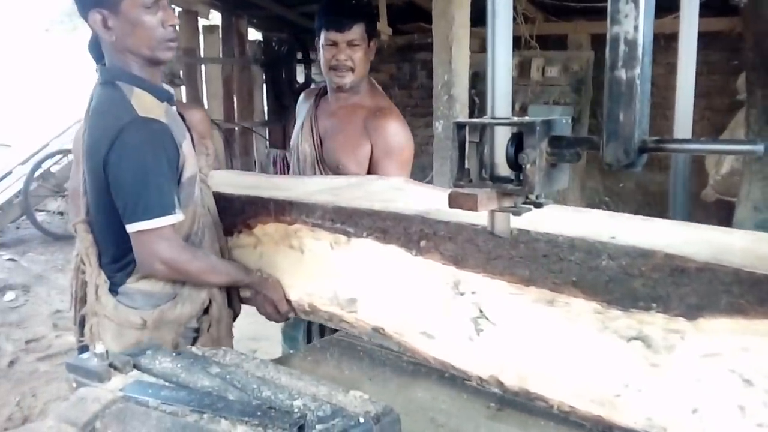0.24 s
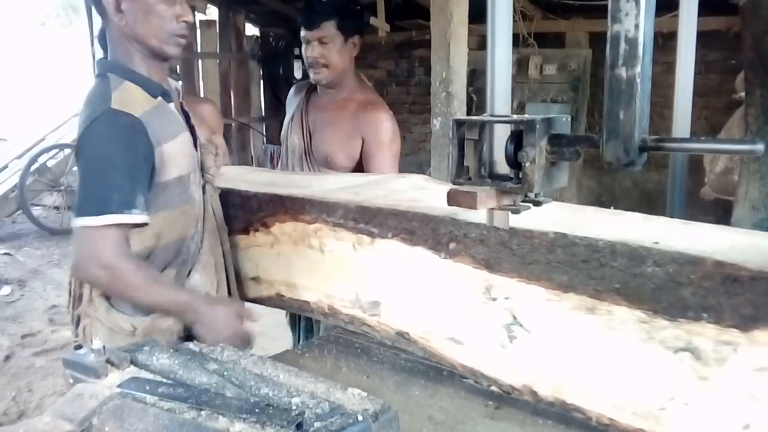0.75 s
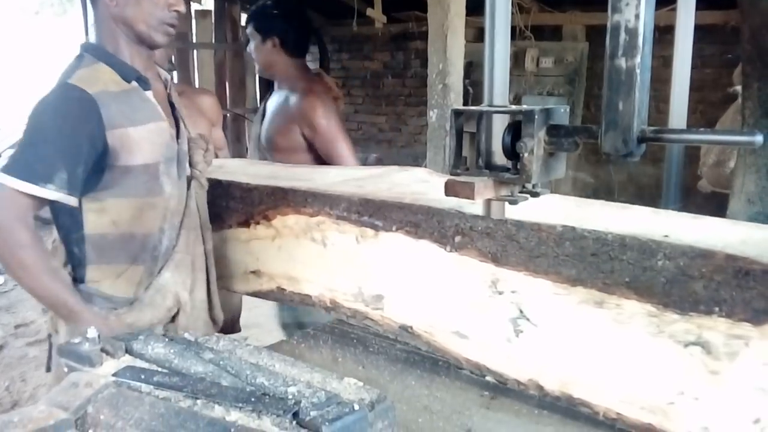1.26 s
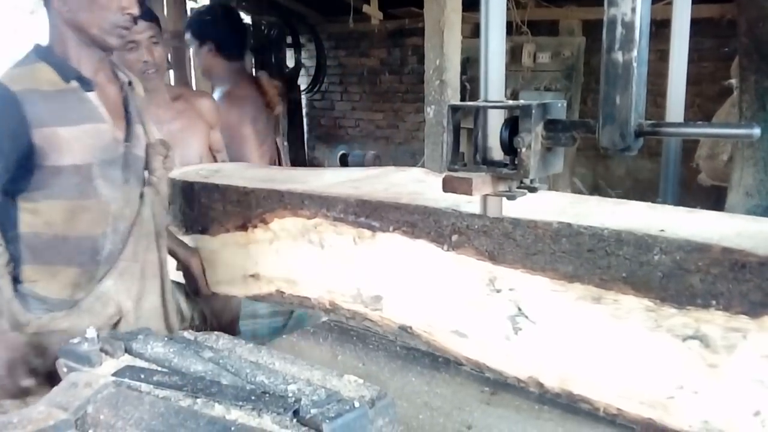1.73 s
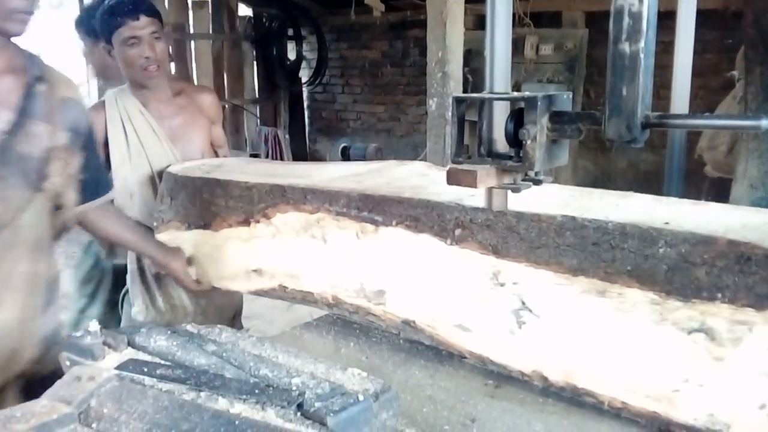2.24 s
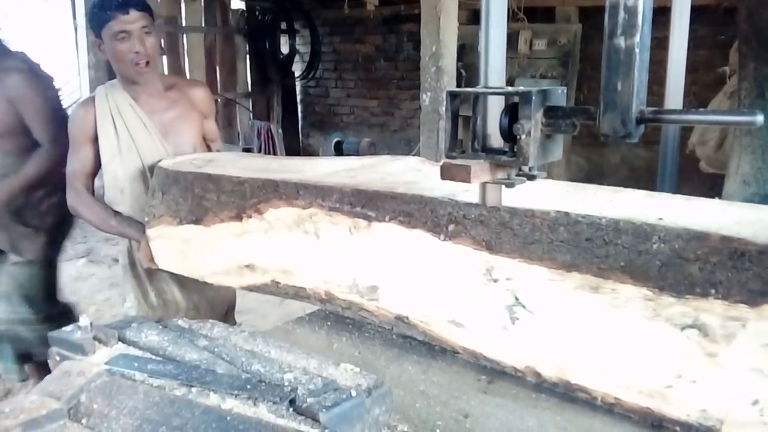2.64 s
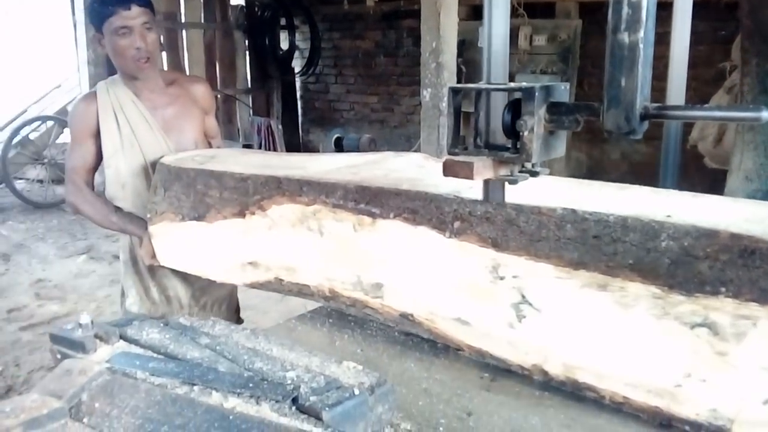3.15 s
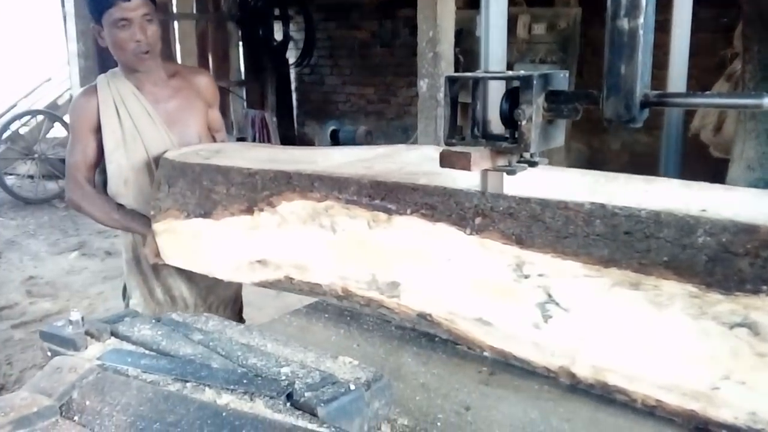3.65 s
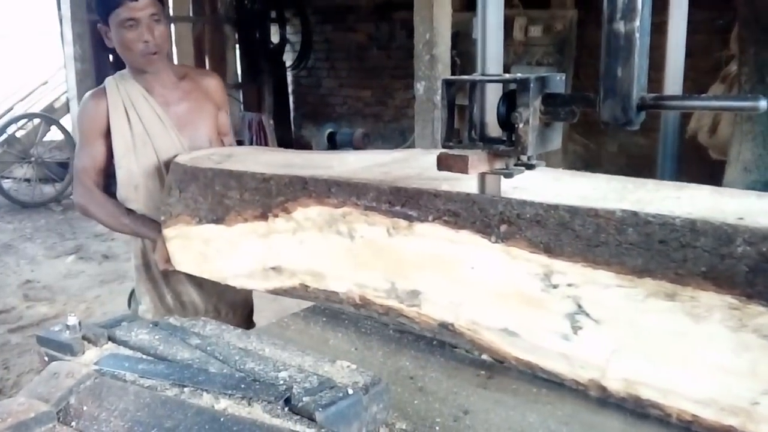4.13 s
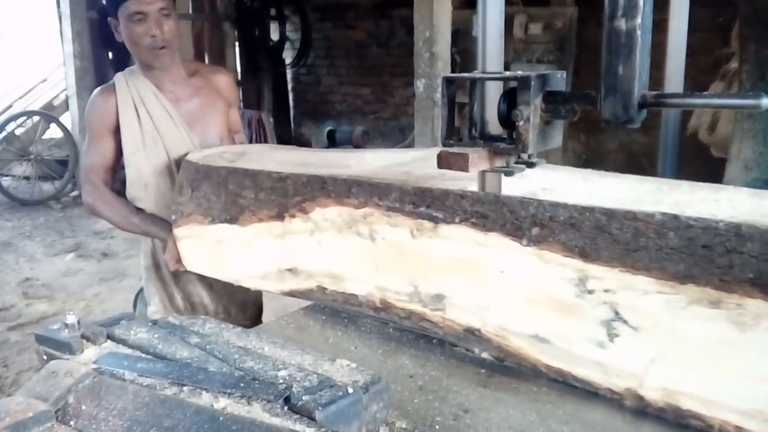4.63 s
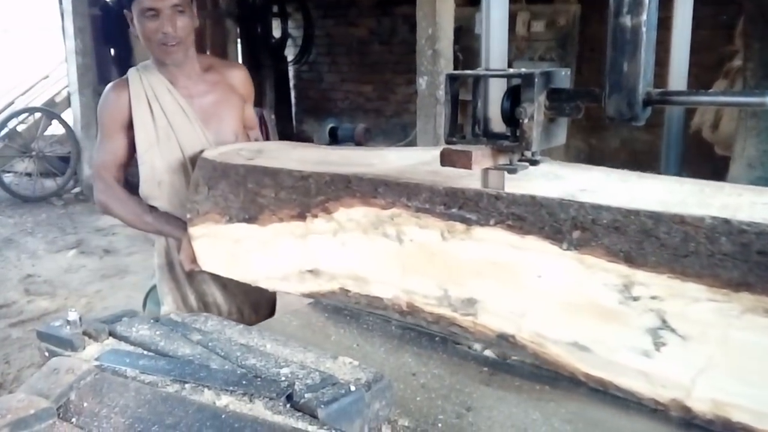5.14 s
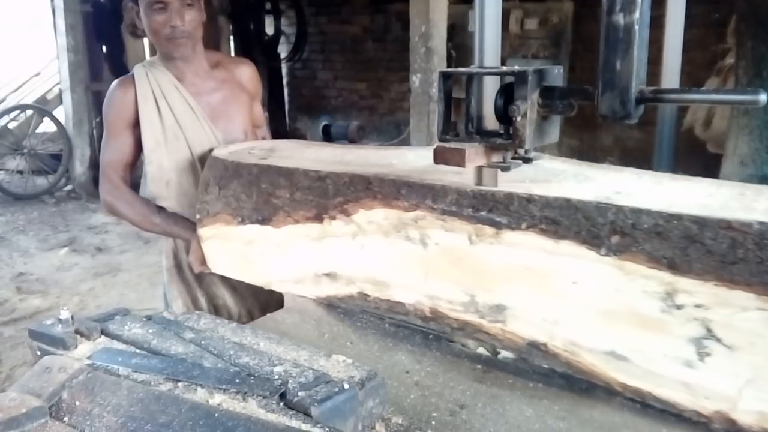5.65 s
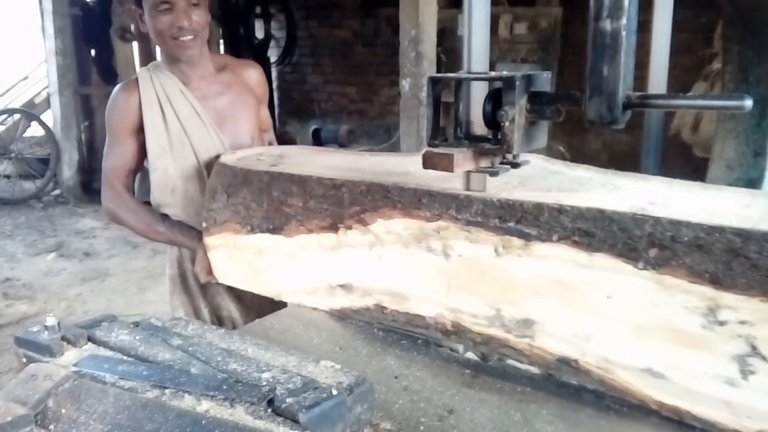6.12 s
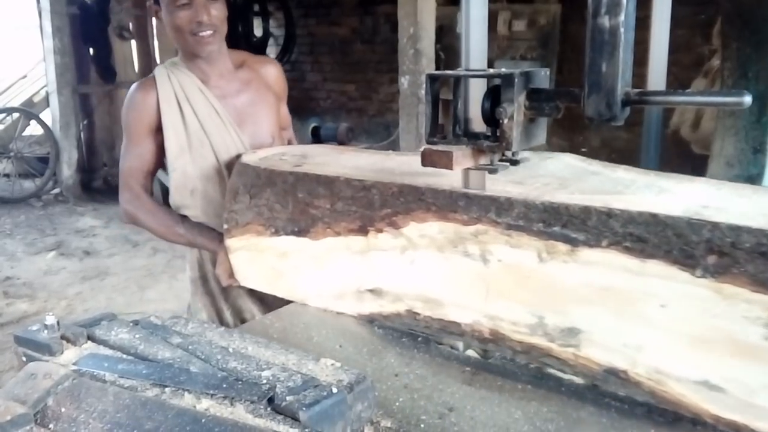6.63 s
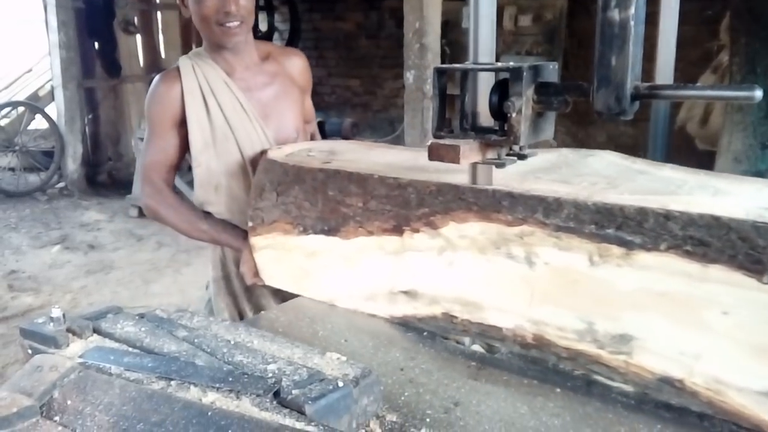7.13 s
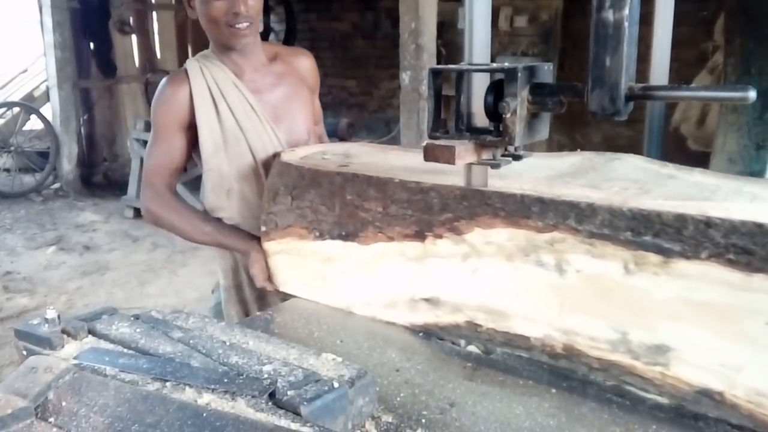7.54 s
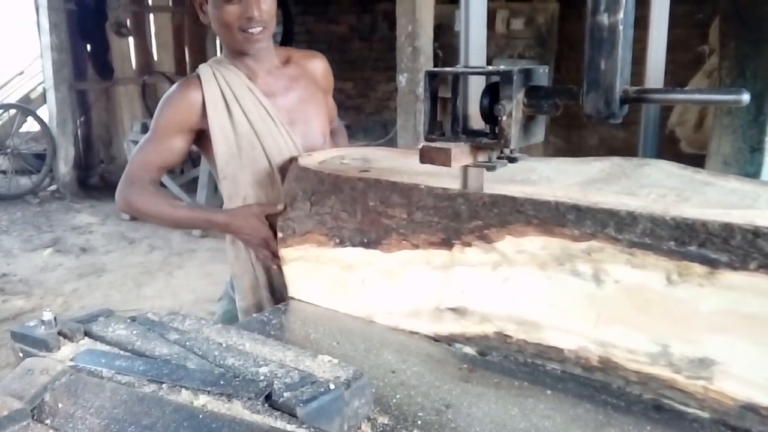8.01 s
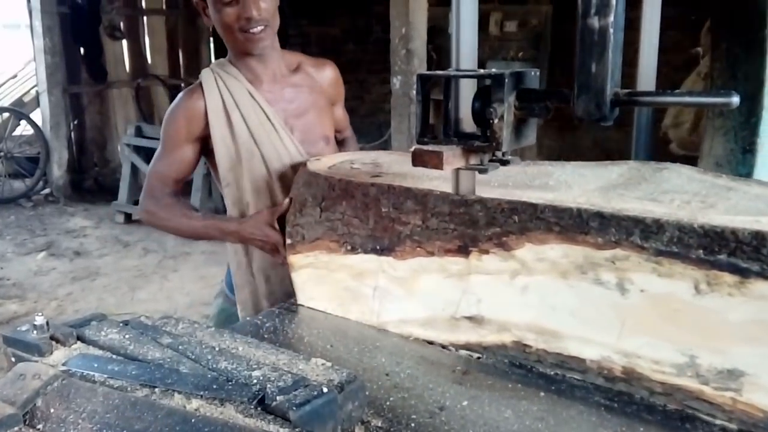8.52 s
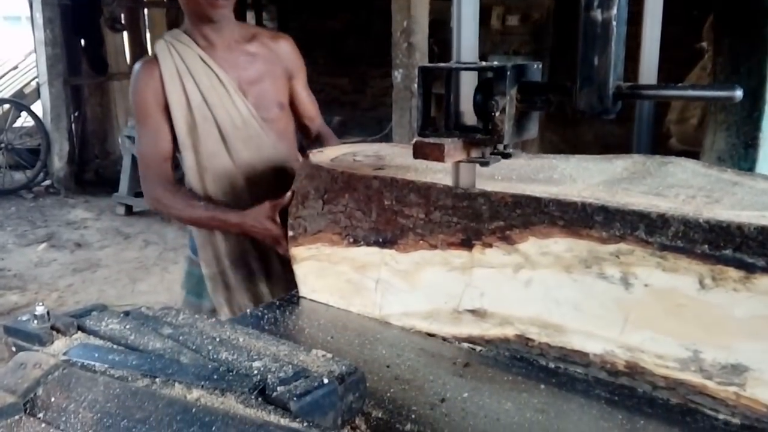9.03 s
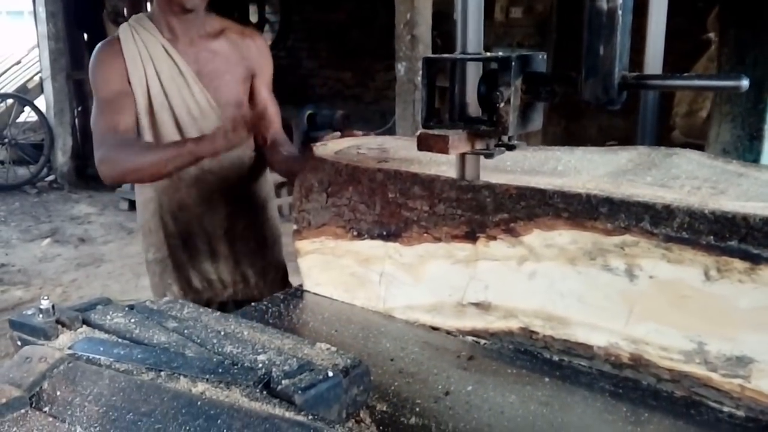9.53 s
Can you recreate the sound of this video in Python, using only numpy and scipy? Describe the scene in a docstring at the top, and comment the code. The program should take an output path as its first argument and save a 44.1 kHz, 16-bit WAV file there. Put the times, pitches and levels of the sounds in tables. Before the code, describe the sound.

A big band saw is already cutting at full noise, close to a single small microphone in an open shed. The blade makes a dense, harsh metallic ring around 3 to 7 kHz, with gritty chip rasp and hiss above and a woody roar around 1 to 2 kHz below. At about 1.2 s the bite lightens and the blade speeds up, pulsing softly about three times a second as its weld passes. At 3.1 s it bites hard again, hiss thickens and pitch sags slightly; this laboured cut lasts to about 8.5 s, roughest and fullest near 8 s, with thin whines surfacing. Short noisy belt cracks with faint thumps come every 0.6 s from 1.2 s, softer around 6.2 s, missing once near 8.1 s, strongest at 9.3 s. From 8.8 s the load eases and low blade tones sing until the sound cuts off still running, near 9.8 s.

```python
"""A large band saw rips a log in an open shed, heard from close by through one small microphone.
Its teeth sound as tones on a strike rate that sags under load; shaped noise makes the chips rasping in the
kerf, the blade ringing in many modes and throbbing once a loop, and the log and frame roaring below.
A belt joint slaps its pulley in short noisy cracks and thumps. Thin sine whines pass, and behind it all
a low sine hum comes and goes over a faint rumble of noise."""
import sys
import numpy as np
from scipy import signal
from scipy.fft import rfft, irfft, next_fast_len
from scipy.io import wavfile
from scipy.ndimage import uniform_filter1d, map_coordinates

SR = 44100
rng = np.random.default_rng(int(sys.argv[2]) if len(sys.argv) > 2 else 0)


def dump(signal):
    """Clip the signal to [-1, 1] and save it as 16-bit WAV at the path in sys.argv[1]."""
    limited = np.clip(np.atleast_2d(signal).T, -1, 1)
    pcm = np.round(limited * 32767).astype(np.int16)
    wavfile.write(sys.argv[1], SR, pcm)


N = 430927  # length in samples

# low hum of the shed, level before it wavers: start_s, end_s, pitch_hz, level_db
HUM_SPELLS = [(.2, 1.1, 71, -61), (5.3, 5.9, 75, -64), (5.95, 7.05, 77.3, -55.5), (7.45, 8.2, 75.5, -58)]
# thin passing tones, level before they waver: start_s, end_s, pitch_hz, level_db
WHINE_SPELLS = [(.35, 1.251, 723, -45), (7.65, 8.25, 1042, -36), (8.05, 8.5, 1940, -42)]
# belt joint slaps, crack before its boost and the pulley: time_s, crack_level_db, thump_level_db
BELT_SLAPS = [(1.209, -19, -38), (1.825, -17, -44), (2.443, -19, -37), (3.057, -20, -41),
              (3.6792, -18, -42.5), (4.3066, -23, -47), (4.9327, -18, -39), (5.5667, -20, -49),
              (6.1988, -31, -40), (6.8295, -27, -49), (7.4594, -21, -45), (8.72, -24, -51),
              (9.3344, -14, -48)]
# resonances of the pulley: centre_hz, width_hz, level_db
PULLEY_MODES = [(500, 340, -12), (1000, 460, 0), (1760, 320, 8.5), (2100, 370, 10.5), (2450, 210, -3)]

# Modes, level over the even noise they stand in: centre_hz, width_hz, level_db
FRAME_MODES = [(308, 20, 2), (398, 37, 4), (592, 68, 0), (728, 30, 3)]
LOG_MODES = [(960, 60, -1), (1165, 70, 4), (1230, 70, 3), (1300, 70, 2), (1400, 40, 0), (1650, 40, 0),
             (2070, 70, 0), (2200, 45, 1)]
BLADE_MODES = [(2710, 22, 6.5), (2770, 38, -0.5), (2890, 43, 7.5), (3030, 30, 0), (3103, 54, 5.5),
               (3250, 55, 6), (3380, 28, 7.5), (3625, 95, 5), (3650, 38, 2.5), (3830, 47, 4), (4007, 31, 7),
               (4100, 36, -1), (4140, 93, 5.5), (4280, 32, 5.5), (4400, 43, 4.5), (4570, 30, 4),
               (4680, 32, 7.5), (4850, 55, 2.5), (5100, 33, 4), (5480, 40, 0), (5584, 50, 3.5),
               (6030, 50, 2.5), (6370, 59, 2.5), (6600, 54, 3), (6700, 38, 2)]
HIGH_BLADE_MODES = [(8350, 150, -2), (8800, 120, -2), (10260, 70, 7), (10710, 60, -2), (11300, 70, 6)]
KERF_MODES = [(7300, 90, 2), (7390, 110, 5), (7475, 80, 3), (7640, 120, 0), (7830, 80, -1)]  # the kerf sings

# Broad colours of each noise, relative level: frequency_hz, level_db
RUMBLE_COLOUR = [(12, -40), (20, -12), (35, -9), (50, 0), (60, -9), (100, -0.5), (150, -1.5), (180, -5.5),
                 (210, -30), (240, -17), (310, -40), (530, -120)]
FRAME_COLOUR = [(130, -62), (220, -35), (295, -14.5), (404, -8.5), (624, -0.5), (814, -2), (900, 1),
                (1170, -30), (1980, -120)]
ROAR_COLOUR = [(470, -40.5), (800, -13.5), (914, -6.5), (1070, -3.5), (1190, -2), (1400, -6.5), (1480, -7),
               (1800, -4), (2250, -4.5), (2550, -6), (2720, -10.5), (3540, -27), (5980, -120)]
RING_COLOUR = [(1500, -42), (2640, -11.5), (2700, -3), (3000, -3), (3350, -7.5), (3700, -2), (3900, -5.5),
               (4240, -3.5), (5210, -3), (6470, -0.5), (7100, -5.5), (9360, -22.5), (15800, -120)]
HISS_COLOUR = [(4710, -40), (8000, -3), (9260, -4.5), (11400, -4.5), (12300, -6), (13300, -6), (13800, -11),
               (14300, -4), (14900, -1.5), (15700, -7)]
RASP_COLOUR = [(4000, -40), (6800, -0.5), (6980, -14), (7150, 1), (7570, -0.5), (8740, -9.5), (9620, -13.5),
               (11500, -17.5), (15000, -41), (22000, -120)]

# blade speed, sagging under load: time_s, tooth_rate_hz
BLADE_SPEED = [(0, 462.5), (.9, 462), (1.15, 468), (1.5, 474.5), (2, 476), (3.1, 476.5), (3.5, 470),
               (3.85, 465), (4.5, 463.5), (4.9, 461), (6.3, 460), (7, 461), (7.8, 462.5), (8.45, 464),
               (8.8, 474), (9.77, 475.5)]
# the log is pushed by hand: time_s, bite (0 light - 1 hard), log_and_frame_trim_db, kerf_rasp_trim_db
LOG_FEED = [(0, 0.79, -1, 2), (.6, 0.79, -0.5, 3), (1.1, 0.77, 1, -1), (1.2, 0, 0, 1.5),
            (1.7, 0.017, -0.5, 0.5), (2.5, 0.044, -1, 3), (3.08, 0, -2, 0.5), (3.17, 0.81, -0.5, 1.5),
            (3.45, 0.92, -1.5, -1), (3.75, 0.95, -1, -0.5), (4.3, 1, 0, 0), (5.15, 0.92, 1.5, -2),
            (5.8, 0.96, 1, -1), (6.6, 0.91, 2, 1), (7.2, 0.92, 0, -1), (7.9, 1, 3.5, 0),
            (8.3, 0.88, 3, -1.5), (8.55, 0.69, 0.5, -1.5), (8.8, 0.56, 2.5, -3.5), (8.88, 0.12, 2, -0.5),
            (9.77, 0.16, 1, -2)]
# tones on the tooth rate, level before they waver: multiple, full_speed_level_db, full_load_level_db
TOOTH_TONES = [(1, -48, -60), (2, -50, -54), (3, -47, -49), (4, -52, -42), (5, -60, -42), (7, -52, -44)]
# a tooth tone sings out for a while: start_s, end_s, multiple, level_db
TOOTH_SINGS = [(1.55, 2.7, 2, -40), (1.9, 3.6, 1, -45), (4.6, 7.3, 7, -36), (4.9, 6.2, 3, -44),
               (6.8, 7.2, 3, -42), (7.6, 7.9, 2, -38), (7.6, 7.9, 3, -38), (7.98, 8.58, 4, -36),
               (8.7, 9.77, 3, -41), (8.85, 10.4, 1, -37), (8.8, 10.2, 2, -34)]

# base level of each noise against the bite: light_cut_db, hard_cut_db
RASP_DB, HISS_DB, SCRAPE_DB = (-27, -20), (-44, -31.5), (-40, -34.5)
LOW_RING_DB, HIGH_RING_DB = (-14.5, -16.5), (-17, -15.5)
ROAR_DB, FRAME_DB = (-25.5, -27.5), (-34.5, -37.5)
RUMBLE_DB = -60.5

FREE_HZ, SAG_HZ = 476.5, 16.5  # tooth rate running light, and its drop under full load
LOOP_TEETH = 138  # teeth on the band
TOP_HZ = 15750  # upper band limit of the microphone


def amp(db):
    """Decibels to a linear factor."""
    return 10 ** (np.asarray(db) / 20)


def unit(x):
    """Scale to rms 1."""
    return x / np.sqrt(np.mean(x ** 2) + 1e-20)


def between(ends, share):
    """The first value at share 0, the second at share 1."""
    return ends[0] + (ends[1] - ends[0]) * share


def curves(rows):
    """One value per sample for each column after the time."""
    time_s, *columns = np.transpose(rows)
    return [np.interp(np.arange(N) / SR, time_s, column) for column in columns]


def wobble(rate, size=N, step=1):
    """A smooth random curve, rate knots a second, one value every step samples."""
    knots = rng.standard_normal(int(N * rate / SR) + 9)
    return map_coordinates(knots, [np.arange(size) * step * rate / SR])


def swell(start_s, end_s):
    """Rises from nothing and sinks back between two times."""
    progress = np.clip((np.arange(N) / SR - start_s) / (end_s - start_s), 0, 1)
    return np.sqrt(np.sin(np.pi * progress).clip(0))


def filtered(x, response):
    """x shaped by a complex response of frequency."""
    size = next_fast_len(N + SR // 2)
    return irfft(rfft(x, size) * response(np.fft.rfftfreq(size, 1 / SR)), size)[:N]


def uneven(shape, bins, frames):
    """Random texture over frequency and time, smoothed across so many bins and frames."""
    smooth = uniform_filter1d(rng.standard_normal(shape), size=bins, axis=0)
    return unit(uniform_filter1d(smooth, size=frames, axis=1))


def rush(colour, modes=(), swell_db=0, swell_rate=1, patchy_db=0, streaky_db=0):
    """Noise of rms 1 in a broad colour; each mode swells by itself, among broad patches and thin passing streaks."""
    hz, frames, noise = signal.stft(rng.standard_normal(N), SR, nperseg=2048)
    power = np.ones(noise.shape)
    for centre_hz, width_hz, level_db in modes:
        level = amp(level_db + swell_db * wobble(swell_rate, size=len(frames), step=1024))
        resonance = 1 / (1 + (2 * (hz - centre_hz) / width_hz) ** 2)
        power += np.outer(resonance, level ** 2)
    patches = uneven(noise.shape, 14, 2)
    streaks = uneven(noise.shape, 3, 4)
    noise = noise * np.sqrt(power) * amp(patchy_db * patches + streaky_db * streaks)
    sound = signal.istft(noise, nperseg=2048)[1][:N]
    colour_hz, colour_db = np.transpose(colour)
    return unit(filtered(sound, lambda f: amp(np.interp(np.log(f + 1), np.log(colour_hz), colour_db))))


def shed():
    """A low sine hum that comes and goes over a faint rumble of noise."""
    t = np.arange(N) / SR
    hum = np.zeros(N)
    for start_s, end_s, pitch_hz, level_db in HUM_SPELLS:
        level = amp(level_db + 2.9 * wobble(7)) * swell(start_s, end_s)
        hum += level * np.sqrt(2) * np.sin(2 * np.pi * pitch_hz * t)
    rumble = amp(RUMBLE_DB + 1.0 * wobble(3)) * rush(RUMBLE_COLOUR, streaky_db=1.5)
    return hum + rumble


def whines():
    """Thin tones, wavering in level and phase, that rise out of the roar and sink back."""
    t = np.arange(N) / SR
    tones = np.zeros(N)
    for start_s, end_s, pitch_hz, level_db in WHINE_SPELLS:
        level = amp(level_db + 3.3 * wobble(12)) * swell(start_s, end_s)
        tones += level * np.sqrt(2) * np.sin(2 * np.pi * pitch_hz * t + 1.2 * wobble(22))
    return tones


def pulley(hz):
    """Response of the pulley: resonances side by side, alternating in sign."""
    response = 0
    for k, (centre_hz, width_hz, level_db) in enumerate(PULLEY_MODES):
        damping = 1j * hz * width_hz
        response = response + (-1) ** k * amp(level_db) * damping / (centre_hz ** 2 - hz ** 2 + damping)
    return response


def belt():
    """Each slap is a short noisy crack in the pulley and a thump in the frame."""
    t = np.arange(SR // 8) / SR
    crack, thump = np.zeros(N + SR), np.zeros(N + SR)
    # each falls 60 dB in its decay time, after an onset of a few milliseconds
    crack_decay_s, thump_decay_s, thump_hz = 0.067, 0.26, 305
    for time_s, crack_db, thump_db in BELT_SLAPS:
        at = round(time_s * SR)
        crack_level = amp(crack_db + 10.0 - 60 * t / crack_decay_s) * (1 - np.exp(-t / .003))
        crack[at:at + len(t)] += crack_level * rng.standard_normal(len(t))
        thump_level = amp(thump_db - 60 * t / thump_decay_s) * (1 - np.exp(-t / .004))
        thump[at:at + len(t)] += thump_level * np.sin(2 * np.pi * thump_hz * t)
    return filtered(crack[:N], pulley) + thump[:N]


def teeth():
    """Tones on multiples of the tooth rate, shifting in balance under load; uneven teeth blur the higher ones."""
    rate_hz, = curves(BLADE_SPEED)
    phase = 2 * np.pi * np.cumsum(rate_hz) / SR
    load = (FREE_HZ - rate_hz) / SAG_HZ
    tones = np.zeros(N)
    for multiple, *ends_db in TOOTH_TONES:
        level = amp(between(ends_db, load))
        for start_s, end_s, sung, level_db in TOOTH_SINGS:
            if sung == multiple:
                level = level + amp(level_db) * swell(start_s, end_s)
        blur = .4 * wobble(24)  # radians at the tooth rate
        tone = np.sqrt(2) * np.sin(multiple * (phase + blur))
        tones += level * amp(3.55 * wobble(11)) * tone
    return tones


def kerf(bite, trim_db, weld, judder):
    """Chips rasp and hiss in the kerf; the weld scrapes through, plainest in a light cut."""
    scrape = amp(between(SCRAPE_DB, bite) + 1.8 * wobble(3)) * weld
    rasp_level = np.hypot(amp(between(RASP_DB, bite) + trim_db), amp(12) * scrape) * amp(0.5 * judder)
    rasp = rasp_level * rush(RASP_COLOUR, KERF_MODES, 2.4, 8., 0.35, 1.6)
    flicker = amp(0.48 * judder + 0.45 * wobble(25))
    hiss_level = np.hypot(amp(between(HISS_DB, bite)), scrape) * flicker
    hiss = hiss_level * rush(HISS_COLOUR, HIGH_BLADE_MODES, 3.0, 3., .6, 1.8)
    return rasp + hiss


def blade(bite, weld, judder):
    """The steel rings in many modes and throbs with the weld; a hard cut favours the high modes."""
    steel = rush(RING_COLOUR, BLADE_MODES, 1.3, 7., 0.36, 1.3)
    low = filtered(steel, lambda hz: 1 / (1 + (hz / 4600) ** 6))
    high = steel - low
    ring = amp(between(LOW_RING_DB, bite)) * low + amp(between(HIGH_RING_DB, bite)) * high
    return amp(0.32 * judder + 0.7 * weld) * ring


def log_and_frame(bite, trim_db, judder):
    """The log roars in its modes with the uneven feed; the frame drones below it."""
    roar_level = amp(between(ROAR_DB, bite) + trim_db + 0.44 * judder)
    roar = roar_level * rush(ROAR_COLOUR, LOG_MODES, 1.2, 5., 0.35, 1.9)
    frame_level = amp(between(FRAME_DB, bite) + trim_db)
    return roar + frame_level * rush(FRAME_COLOUR, FRAME_MODES, 1.7, 3.0, 0.42, 1.56)


def cut():
    """The bite drives chips, blade, log and frame together; the weld of the band passes once a loop."""
    bite, wood_trim_db, rasp_trim_db = curves(LOG_FEED)
    loops = np.cumsum(curves(BLADE_SPEED)[0]) / SR / LOOP_TEETH + .28
    weld = np.exp(3.6 * (np.cos(2 * np.pi * loops) - 1))  # a smooth pulse peaking at 1
    judder = wobble(14) + 1.26 * wobble(40)  # uneven feed, shared by kerf, blade and log
    wood = log_and_frame(bite, wood_trim_db, judder)
    return wood + blade(bite, weld, judder) + kerf(bite, rasp_trim_db, weld, judder)


def scene():
    """All sources summed at the one microphone position, the same on both channels."""
    return np.tile(shed() + whines() + belt() + teeth() + cut(), (2, 1))


def record(dry):
    """One microphone on both channels: peaks round off softly, nothing passes above its band limit."""
    soft = dry[0] / (1 + np.abs(dry[0] / .95) ** 5) ** (1 / 5)
    return np.tile(filtered(soft, lambda hz: hz < TOP_HZ), (2, 1))


dry = scene()
out = record(dry)
dump(out)
```